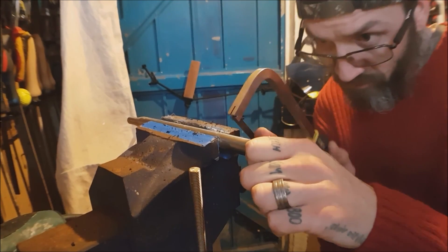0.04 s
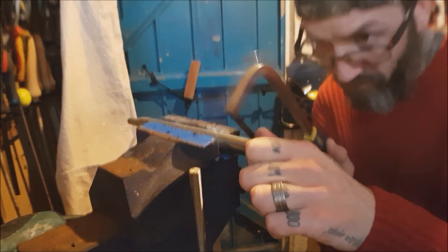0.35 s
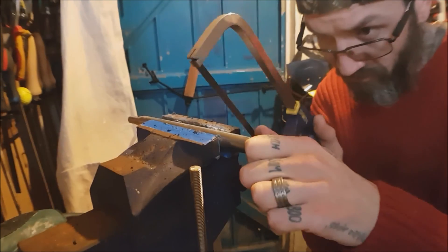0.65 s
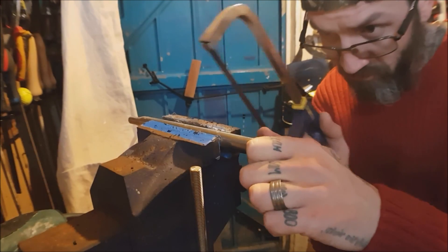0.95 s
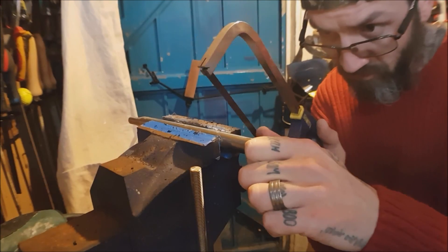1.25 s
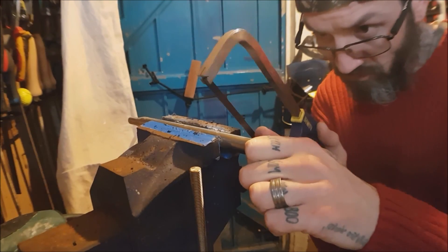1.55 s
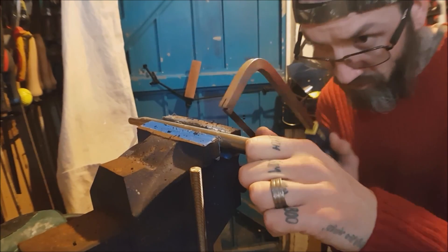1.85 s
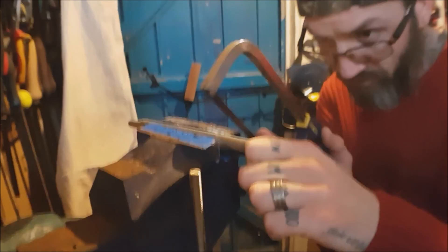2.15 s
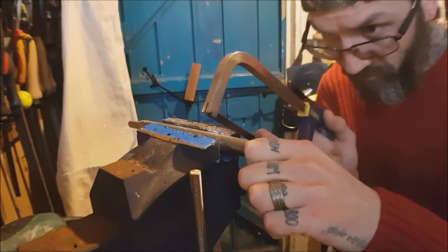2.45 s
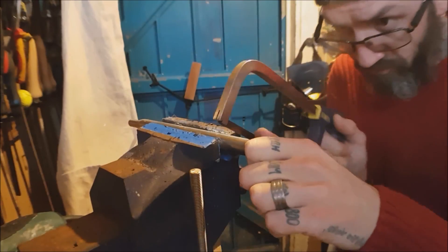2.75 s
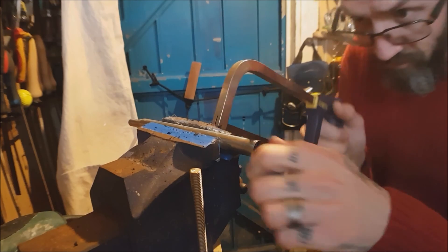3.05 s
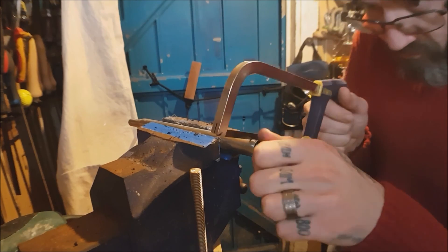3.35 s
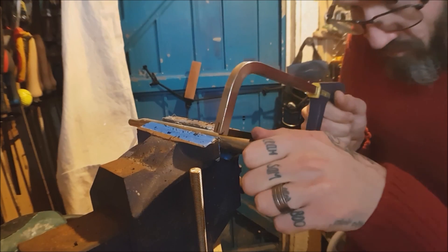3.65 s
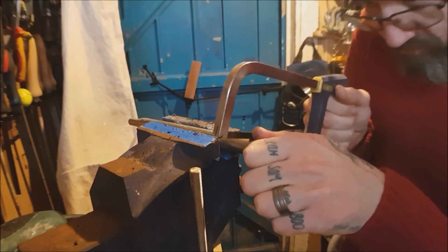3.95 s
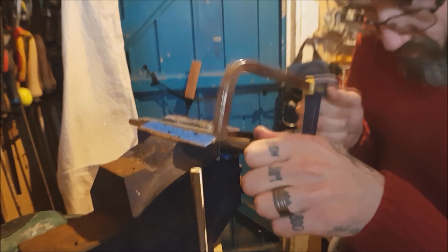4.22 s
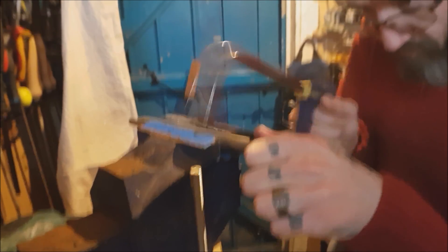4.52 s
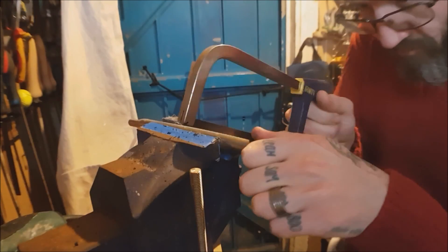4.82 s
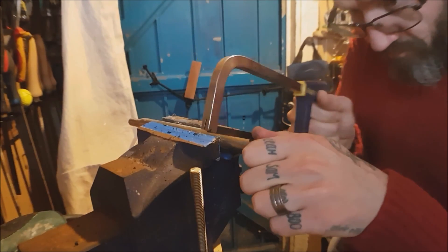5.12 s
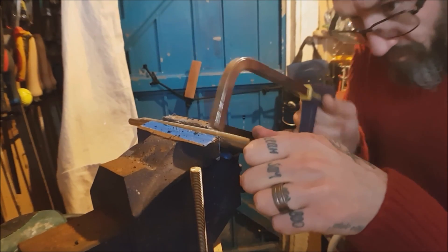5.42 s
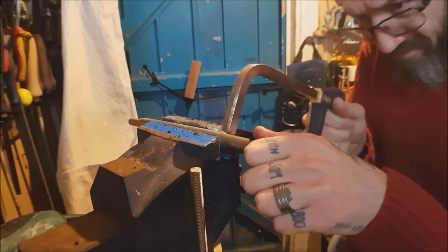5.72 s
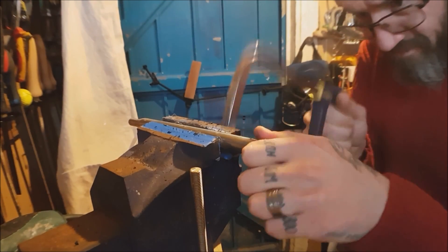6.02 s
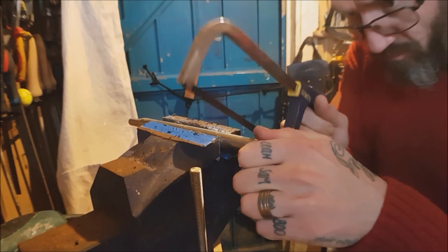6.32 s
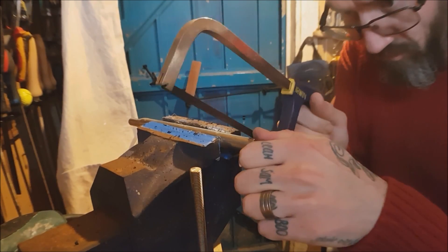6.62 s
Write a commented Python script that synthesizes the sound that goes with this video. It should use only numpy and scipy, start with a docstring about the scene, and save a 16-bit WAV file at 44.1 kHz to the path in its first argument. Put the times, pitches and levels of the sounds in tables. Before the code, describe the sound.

In a small, quiet workshop, hacksaw teeth scrape over a clamped metal tube in brief, hesitant strokes. Two hard, chattering snags stand out early; a softer stretch of ticks and wooden thumps follows, then a cluster of sharp metallic catches and lighter rasps that thin out. The blade sings thinly as it comes free. The sound is stereo, with the saw a little to the right over a faint hush of air.

```python
"""A hacksaw starts a cut in a metal tube held in a bench vise, in short, hesitant strokes.
The teeth rasp over the tube wall, catch and jump; tube and saw frame ring briefly, and the blade
sings as it comes free. Every push thumps through the vise into the wooden bench.
The place is a small workshop with a low boom and a faint hush of air. The microphone is stereo,
with the saw a little to its right."""
import sys
import numpy as np
from scipy import signal
from scipy.io import wavfile
from scipy.ndimage import uniform_filter1d

SR = 44100
rng = np.random.default_rng(int(sys.argv[2]) if len(sys.argv) > 2 else 0)


def pcm_store(signal):
    """Save signal as 16-bit PCM."""
    levels = np.round(np.clip(np.atleast_2d(signal), -1, 1) * 32767)
    wavfile.write(sys.argv[1], SR, levels.astype(np.int16).T)


N = 298547

# Strokes of the saw. Each row: start in seconds, length in seconds before the last fade, rasp level
# in dB, then treble and push on the bench, both in dB relative to the rasp.
STROKES = [(0, 0.02945, -24.5, 2, 0), (0.442, .06, -36, -5, 10.5), (.505, 0.11461, -26, -4, -0.5),
           (0.639, 0.08332, -43.5, -9, 3), (1.531, 0.04878, -50.5, -4.5, -4), (1.731, .14, -26.5, -1, -1.5),
           (2.077, 0.072615, -33.5, -12, 4), (2.197, .115, -22.5, 1, -0.5),
           (2.377, 0.084404, -43, -12.5, 9), (2.498, 0.070927, -33.5, -5.5, 2.5),
           (2.718, 0.039336, -51.5, -27, 7.5), (2.766, 0.088306, -30.5, -1, -1),
           (3.066, .04, -57, -11.5, 12.5), (3.702, 0.091905, -46, -9, 10),
           (3.797, 0.043095, -48.5, -15.5, 9.5), (4.044, .12, -42.5, -9, 9.5), (4.3, .08, -42, -3, 4.5),
           (4.492, .075, -44.5, -13, 8.5), (4.586, 0.043776, -31, -2.5, 2.5), (4.651, .135, -22.5, 2, 3),
           (5.094, 0.10133, -33.5, -3, 1.5), (5.322, 0.03786, -51.5, -27.5, 8.5),
           (5.376, 0.059, -37.5, -5, 7.5), (5.604, 0.063747, -34.5, -10, 8.5),
           (5.756, 0.08307, -52.5, -9.5, 3), (5.852, 0.09703, -33.5, -2.5, 6),
           (6.066, 0.053908, -45, -18.5, 5.5), (6.188, 0.036006, -49.5, 6, 9.5),
           (6.738, .018, -45.5, 0.5, 8.5)]
# A tooth catches and lets go. Each row: time in seconds, crack level in dB, treble in dB relative to
# the crack, number of jolts as the blade skips on.
SNAGS = [(.503, 12, 0, 2), (.804, -32, -20, 1), (1.299, -28, -8.5, 1), (1.474, -27, -1, 1),
         (1.589, -21, -18, 1), (2.197, 11, 2.5, 4), (2.482, -16, -18, 1), (3.325, -36.5, 5.5, 1),
         (3.605, -28.5, 1.5, 1), (3.749, -20.5, -16, 1), (4.096, -14.5, -8.5, 1), (4.116, 6, -9, 1),
         (4.29, -11.5, -6.5, 1), (4.4, 11, -13, 1), (4.488, -11.5, 3.5, 1), (4.652, 12, -0.5, 3),
         (4.806, -0.5, 9.5, 1), (4.943, -19.5, -0.5, 1), (5.691, 6, -17, 1), (5.88, -8, -0.5, 1)]
# The blade shifts in the notch between strokes. Each row: start and end in seconds, level in dB.
NUDGES = [(1.301, 1.623, -69.5), (1.62, 1.731, -57), (3.1, 3.422, -69), (4.171, 4.29, -55),
          (4.961, 5.094, -62.5)]
# The blade comes free of the notch. Each row: time in seconds, level of its note in dB.
RELEASES = [(0.03, -46), (0.58, -32), (2.554, -49.5), (2.841, -57), (5.17, -49)]
# Names of the three steel parts that radiate the rasp: tube wall, blade and vise jaws.
STEEL_PARTS = ("tube wall", "blade", "vise jaws")
# Tone of the clamped steel. Each row: frequency in Hz, relative spectral density in dB.
STEEL_SPECTRUM = [(250, -10), (400, -5.5), (540, 1), (720, -4), (1100, -4.5), (1550, 3), (2200, -5),
                  (4200, -4.5), (5600, -9.5), (7200, -8), (9000, -14.5), (13000, -12.5), (16000, -10.5)]
# Its decay in the workshop. Each row: frequency in Hz, seconds to fall by 60 dB (t60).
STEEL_T60 = [(300, 0.13), (1500, 0.17), (4000, 0.1), (14000, 0.05)]
# The hand holds the tube in two ways. Each row: start and end in seconds, tube note in Hz, its t60 in
# seconds, overtones of tube and saw frame in Hz.
GRIPS = [(0, 3.5, 889, .09, (530, 1294, 1548, 1675, 1962, 2278, 2595, 3050, 3390, 4171)),
         (3.5, 7, 930, .07, (1292, 1431, 1660, 2048, 2380, 2570, 2600, 3187, 3380, 4340))]
# Strength of those overtones. Each row: frequency in Hz, level in dB.
OVERTONE_LEVELS = [(530, -10.5), (1400, -15.5), (2500, -17.5), (4200, -15.5)]
# Tone of the wooden bench. Each row: frequency in Hz, relative spectral density in dB.
BENCH_SPECTRUM = [(30, -21.5), (55, -5.5), (90, -3.5), (125, -6), (190, -0.5), (260, -10), (330, -8.5),
                  (450, -21.5), (700, -53)]
# Decay of the bench. Each row: frequency in Hz, t60 in seconds.
BENCH_T60 = [(40, 0.52), (110, 0.16), (200, 0.28), (350, 0.1)]
# Single resonances of the bench. Each row: frequency in Hz, level in dB, t60 in seconds.
BENCH_MODES = [(88.648, -6.5, 0.3), (156.43, -4.5, 0.33), (309.27, -6.5, 0.17)]
# Low reverberation of the workshop. Each row: frequency in Hz, relative spectral density in dB.
BOOM_SPECTRUM = [(40, -21), (90, -8), (140, -7.5), (190, -2), (260, -16.5), (400, -22), (900, -42)]
# Decay of that boom. Each row: frequency in Hz, t60 in seconds.
BOOM_T60 = [(80, 0.67), (200, 1.3), (500, 0.6)]
# Still air of the workshop. Each row: frequency in Hz, relative spectral density in dB.
AIR_SPECTRUM = [(25, 6.5), (60, -9), (160, -9.5), (300, -20), (600, -21.5), (1500, -27), (4000, -34),
                (8000, -41), (16000, -36)]
# How alike the microphone's two sides are. Each row: frequency in Hz, correlation from 0 to 1.
STEREO_LIKENESS = [(60, 0.54), (250, 1), (600, 0.075), (1200, 0.18), (3000, 0.056), (8000, 0.032),
                   (16000, 0.11)]

# A set of forces has one row per steel part, then one for the bench and one for the tube's note.
STEEL_ROWS, WALL_ROW, BENCH_ROW, NOTE_ROW = slice(0, -2), 0, -2, -1
FORCE_SHAPE = (len(STEEL_PARTS) + 2, N)


def strokes(entry_db, exit_db, push_low_hz, note_db, speeding_share=.45, lag_s=.01):
    """Forces of each stroke as the blade speeds up and slows; bench and tube note follow lag_s later."""
    forces = np.zeros(FORCE_SHAPE)
    for start, length, db, treble_db, push_db in STROKES:
        rise = length * speeding_share
        fall = length - rise
        t = np.arange(int((rise + 2 * fall) * SR)) / SR
        speeding_db = entry_db * (1 - t / rise) ** 2
        slowing_db = exit_db * ((t - rise) / fall) ** 2
        effort = from_db(np.where(t < rise, speeding_db, slowing_db))
        force = effort * rasp(effort ** .35, uneven_db=4.0, friction_db=-4.5, judder_db=3.5)
        push = butter(force[-1], push_low_hz, "high")  # the jaws shake the bench without rocking it
        add(forces[STEEL_ROWS], start, brighten(from_db(db) * force, treble_db))
        add(forces[BENCH_ROW], start + lag_s, from_db(db + push_db) * push)
        add(forces[NOTE_ROW], start + lag_s, from_db(note_db + db) * force[WALL_ROW])
    return forces


def rasp(speed, uneven_db, friction_db, judder_db, top_teeth_per_s=420, bite_s=.0003):
    """Teeth tick over the edge of the cut, over the hiss of torn chips; one row per steel part."""
    size = len(speed)
    teeth_passed = np.cumsum(top_teeth_per_s * speed * rng.exponential(1, size)) / SR + rng.random()
    depth = from_db(uneven_db * np.clip(rng.standard_normal(size), -2, 2))  # each tooth bites differently
    ticks = np.diff(np.floor(teeth_passed), prepend=0) * depth
    bite = signal.lfilter([1], [1, -np.exp(-1 / (bite_s * SR))], ticks)
    contact = rms_one(bite) + from_db(friction_db)
    stick_slip = from_db(judder_db * judder(size, hz=256.56))
    load = from_db(5.1 * np.array([judder(size, hz=45.56) for _ in STEEL_PARTS]))
    share = load / np.sqrt(np.mean(load ** 2, axis=0))  # the load wanders from part to part
    return rms_one(stick_slip * share * contact * rng.standard_normal(share.shape))


def judder(size, hz):
    """The blade sticks and slips unevenly: a curve through hz random values a second."""
    steps = np.arange(size) * hz / SR
    values = np.clip(rng.standard_normal(int(steps[-1]) + 2), -2, 2)
    return np.interp(steps, np.arange(len(values)), values)


def snags(chatter_s, chatter_db, note_db, lurch_s, lurch_lag_s, lurch_db):
    """A tooth lands or snaps free with a jolt, its neighbours chatter after it, and the bench lurches."""
    forces = np.zeros(FORCE_SHAPE)
    t = np.arange(SR // 25) / SR
    jolt = 1.0 * (t == 0)
    shove = np.sin(np.pi * np.minimum(t / lurch_s, 1))
    for s, db, treble_db in jolts():
        chatter = unit_energy(rng.standard_normal((len(STEEL_PARTS), len(t))) * np.exp(-t / chatter_s))
        direction = rng.choice([-1, 1], (len(STEEL_PARTS), 1))
        crack = brighten(direction * jolt + from_db(chatter_db) * chatter, treble_db)
        add(forces[STEEL_ROWS], s, from_db(db) * crack)
        add(forces[BENCH_ROW], s, from_db(.92 * db) * jolt)  # light touches have a larger share of thump
        add(forces[BENCH_ROW], s + lurch_lag_s, from_db(db + lurch_db) * direction[WALL_ROW] * shove)
        add(forces[NOTE_ROW], s, from_db(db + note_db) * jolt)
    return forces


def jolts(touch_db=20, skip_s=.025, skip_stretch=1.12, skip_loss_db=1.52):
    """Each stroke opens with a tick; after a hard snag the blade skips, each time later and weaker."""
    touches = [(start, db + touch_db, treble_db) for start, _, db, treble_db, _ in STROKES]
    skips = [(s + skip_s * k ** skip_stretch, db - skip_loss_db * k, treble_db)
             for s, db, treble_db, count in SNAGS for k in range(count)]
    return touches + skips


def nudges(speed, treble_db, bench_db):
    """Barely moving teeth tick and scratch dully in the notch."""
    forces = np.zeros(FORCE_SHAPE)
    for start, end, db in NUDGES:
        creep = np.full(int((end - start) * SR), speed)
        force = from_db(db) * rasp(creep, uneven_db=0.5, friction_db=-1.0, judder_db=6.5)
        add(forces[STEEL_ROWS], start, brighten(force, treble_db))
        add(forces[BENCH_ROW], start, from_db(bench_db) * force[-1])
        add(forces[NOTE_ROW], start, force[WALL_ROW])
    return forces


def steel(forces, direct_db):
    """The contact reaches the microphone directly and through the ringing steel parts."""
    parts = sum(sound_of(force, dense_ring(STEEL_SPECTRUM, STEEL_T60, swell_cycles=.4))
                for force in forces)
    direct = from_db(direct_db) * butter(forces[WALL_ROW], 1500, "high")
    return parts / np.sqrt(len(STEEL_PARTS)) + direct


def tube(note_force, wall_force, note_db, regrip_db, overtone_t60_s=.074):
    """The tube rings with a note and overtones; the note is higher and more damped in the second grip."""
    t, out = np.arange(N) / SR, 0
    for start, end, hz, t60, overtones in GRIPS:
        held = (t >= start) * (t < end)
        note = clear_ring([(hz, note_db + regrip_db * (start > 0), t60)], spread_rad=0.21)
        modes = [(f, at_hz(OVERTONE_LEVELS, f), overtone_t60_s) for f in overtones]
        upper = clear_ring(modes, spread_rad=0.68)
        out = out + rubbed(note_force * held, note, window=1500) + sound_of(wall_force * held, upper)
    return out


def blade(hz, t60_s, swell_s):
    """Damped while it cuts, the taut blade sings thinly once the pressure is off."""
    t, out = np.arange(SR // 2) / SR, np.zeros(N)
    note = np.sin(2 * np.pi * hz * t) * (1 - np.exp(-t / swell_s)) * from_db(-60 * t / t60_s)
    for s, db in RELEASES:
        add(out, s, from_db(db) * note)
    return out


def bench(force):
    """The heavy bench takes a moment to get going, and the room booms on after it."""
    wood = from_db(-2.0) * dense_ring(BENCH_SPECTRUM, BENCH_T60, swell_cycles=1.1)
    modes = clear_ring(BENCH_MODES, spread_rad=0.15)
    boom = from_db(-14.5) * dense_ring(BOOM_SPECTRUM, BOOM_T60, swell_cycles=3.0)
    return rubbed(force, butter(wood + modes + boom, 41, "high"), window=3000)


def room_tone(db):
    """The workshop's still air: a faint, dull hush all round the microphone."""
    hush = sum(from_db(at_hz(AIR_SPECTRUM, hz)) * band for hz, band in noise_bands(N))
    return from_db(db) * rms_one(hush)


def dense_ring(spectrum, t60s, swell_cycles):
    """Countless overlapping modes and reflections answer a tap; low bending waves arrive last."""
    t = np.arange(SR) / SR
    t = t[t < 1.5 * max(t60 for _, t60 in t60s)]
    out = np.zeros((2, SR))
    for hz, band in noise_bands(SR):
        envelope = (1 - np.exp(-t * hz / swell_cycles)) * from_db(-60 * t / at_hz(t60s, hz))
        gain = np.sqrt(hz) * from_db(at_hz(spectrum, hz))  # higher bands are wider
        add(out, 0, gain * unit_energy(band[:, :len(t)] * envelope))
    return unit_energy(out)


def clear_ring(modes, spread_rad):
    """Single modes answer a tap; each reaches the microphone's two sides a little out of phase."""
    t, out = np.arange(SR) / SR, 0
    for hz, db, t60 in modes:
        phase = 2 * np.pi * hz * t + spread_rad * rng.standard_normal((2, 1))
        out = out + from_db(db) * unit_energy(np.sin(phase) * from_db(-60 * t / t60))
    return out


def rubbed(force, ring, window):
    """A rubbed resonance: over a window of samples its level follows the work done on it."""
    sound = sound_of(force, ring)
    work = np.abs(sound_of(force ** 2, np.mean(ring ** 2, axis=0)[None]))
    due, present = (np.abs(uniform_filter1d(power.mean(axis=0), window)) + 1e-12
                    for power in (work, sound ** 2))
    return sound * np.sqrt(due / present)


def sound_of(force, ring):
    """A force played through a body's answer to one tap."""
    return signal.oaconvolve(force[None], ring, axes=1)[:, :N]


def brighten(force, treble_db):
    """Sharp contacts carry more treble than blunt ones."""
    dull = signal.sosfilt(signal.butter(1, 4200, "low", fs=SR, output="sos"), force)
    return dull + from_db(treble_db) * (force - dull)


def noise_bands(size):
    """Half-octave bands of stereo noise with their centres in Hz; the sides are most alike in the bass."""
    edges, settle = np.geomspace(24, 17500, 20), SR // 4
    for low, high in zip(edges, edges[1:]):
        hz = np.sqrt(low * high)
        mid, side = butter(rng.standard_normal((2, size + settle)), [low, high], "band")[:, settle:]
        alike = at_hz(STEREO_LIKENESS, hz)
        yield hz, np.sqrt(1 + alike) * mid + np.sqrt(1 - alike) * side * [[1], [-1]]


def from_db(db):
    """Decibels to gain."""
    return 10 ** (np.asarray(db) / 20)


def rms_one(x):
    """Scaled to a mean power of 1."""
    return x / np.sqrt(np.mean(x ** 2) + 1e-20)


def unit_energy(x):
    """Scaled to a mean energy of 1 per row."""
    return x / np.sqrt(np.mean(np.sum(x ** 2, axis=-1)) + 1e-20)


def at_hz(table, hz):
    """Read a table along a log-frequency axis."""
    frequencies, values = np.array(table).T
    return np.interp(np.log(hz), np.log(frequencies), values)


def butter(x, hz, kind):
    """Second-order low-, high- or band-pass."""
    return signal.sosfilt(signal.butter(2, hz, kind, fs=SR, output="sos"), x)


def add(track, s, piece):
    """Mix a piece into a track from s seconds on."""
    start = max(0, round(s * SR))
    span = track[..., start:start + piece.shape[-1]]
    span += piece[..., :span.shape[-1]]


def scene():
    """At the microphone: strokes, snags and nudges sound through steel, tube and bench, over room tone."""
    forces = strokes(entry_db=-12.0, exit_db=-18.5, push_low_hz=84.54, note_db=4.0)
    forces += snags(chatter_s=.0023, chatter_db=-5.0, note_db=-0.5,
                    lurch_s=.009, lurch_lag_s=.045, lurch_db=-42.5)
    forces += nudges(speed=0.2, treble_db=-14.0, bench_db=2.5)
    metal = tube(forces[NOTE_ROW], from_db(2.5) * forces[WALL_ROW], note_db=-2.5, regrip_db=-5.0)
    metal += steel(forces[STEEL_ROWS], direct_db=-11.0)
    metal += blade(hz=2920, t60_s=.27, swell_s=.008)
    thumps = bench(forces[BENCH_ROW])
    left, right = metal * from_db([[.3], [-.3]]) + thumps * from_db([[1.1], [-1.1]])
    left = np.interp(np.arange(N) - 4, np.arange(N), left)  # farther from the saw: 4 samples later
    return np.array([left, right]) + room_tone(db=-59)


def record(dry):
    """The recorder rounds the peaks and cuts the top above 16.2 kHz."""
    rounded = 1.148 * np.tanh(dry / 1.2245)
    return signal.sosfilt(signal.ellip(10, .1, 80, 16200, fs=SR, output="sos"), rounded)


dry = scene()
out = record(dry)
pcm_store(out)
```